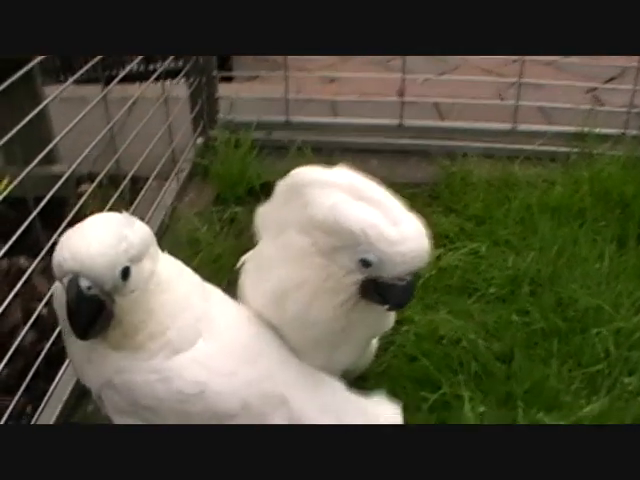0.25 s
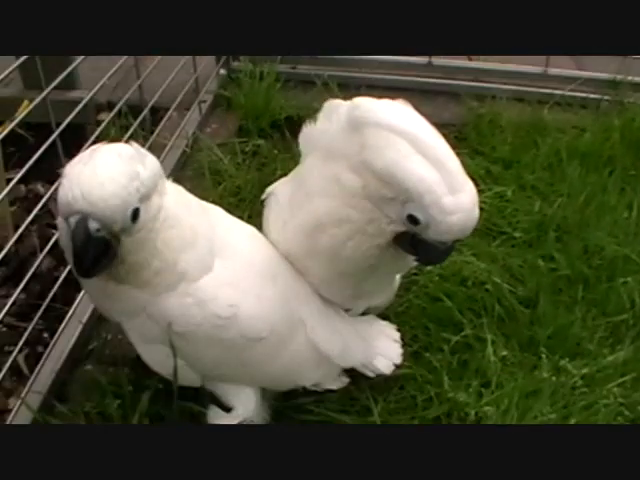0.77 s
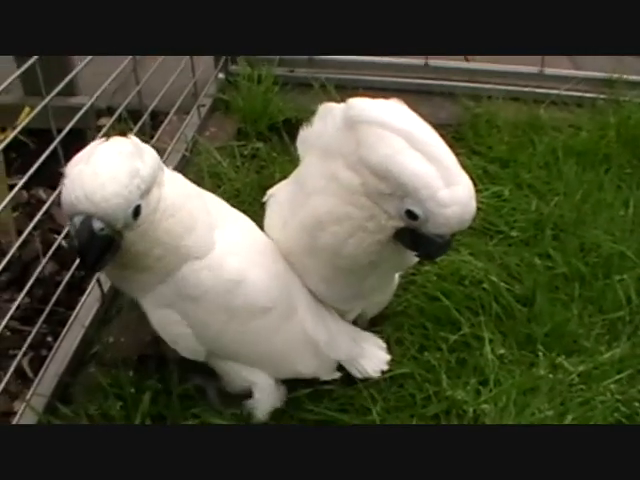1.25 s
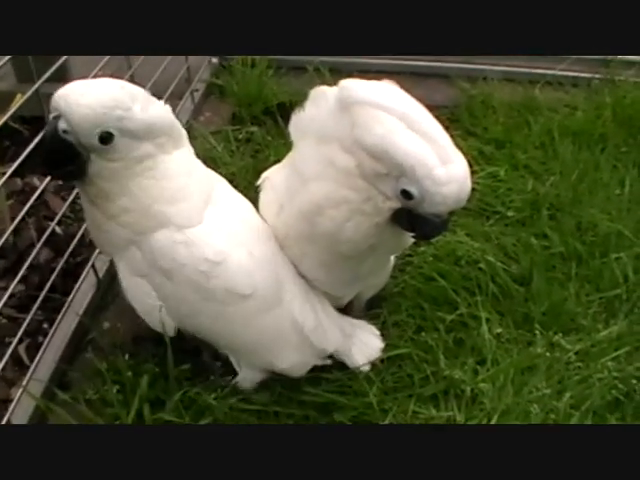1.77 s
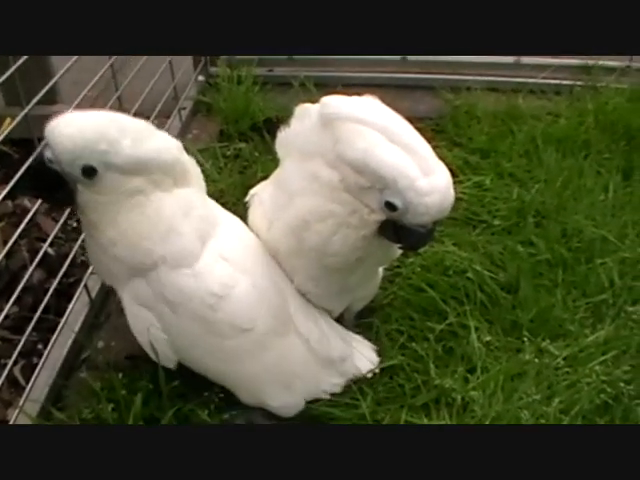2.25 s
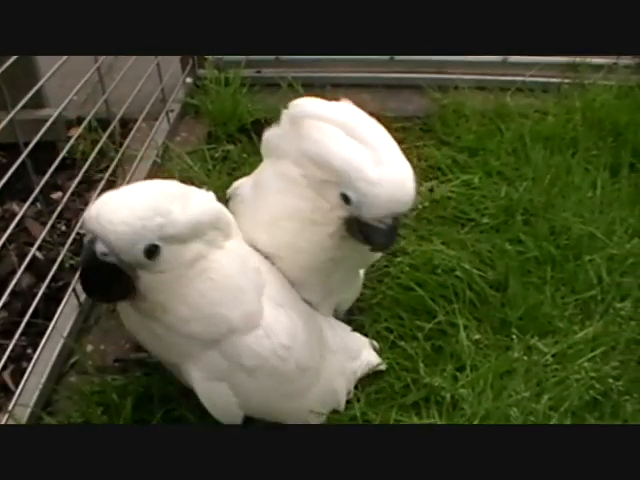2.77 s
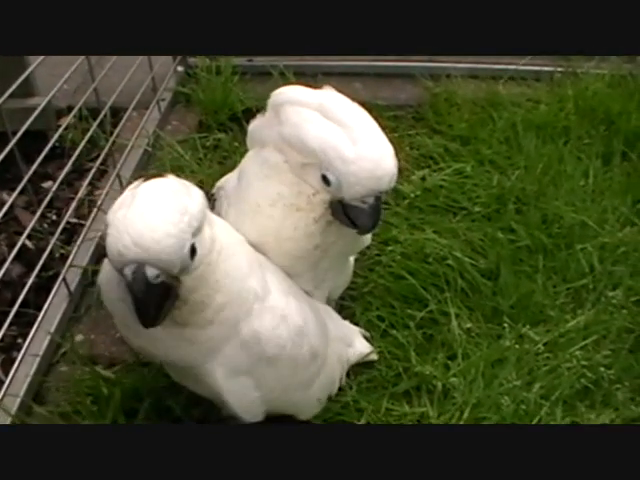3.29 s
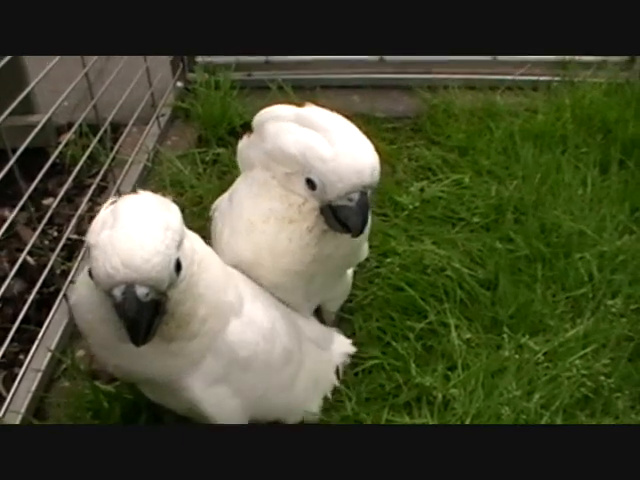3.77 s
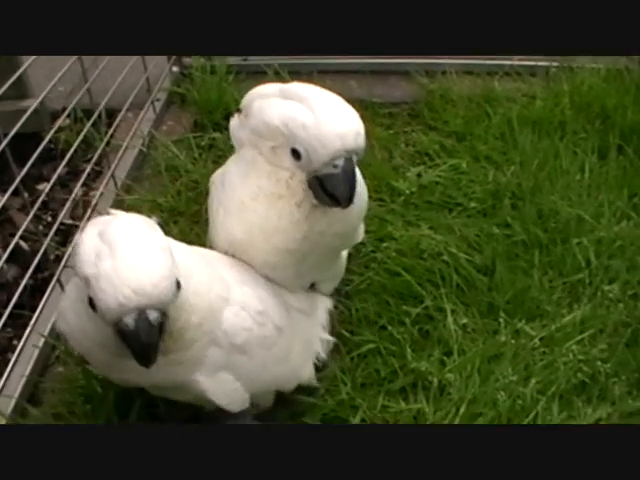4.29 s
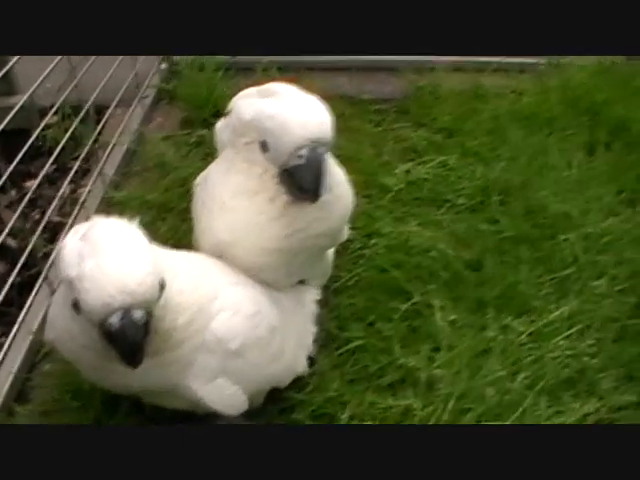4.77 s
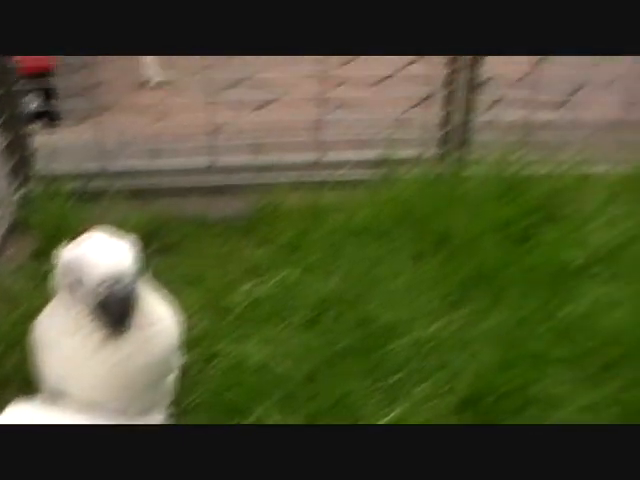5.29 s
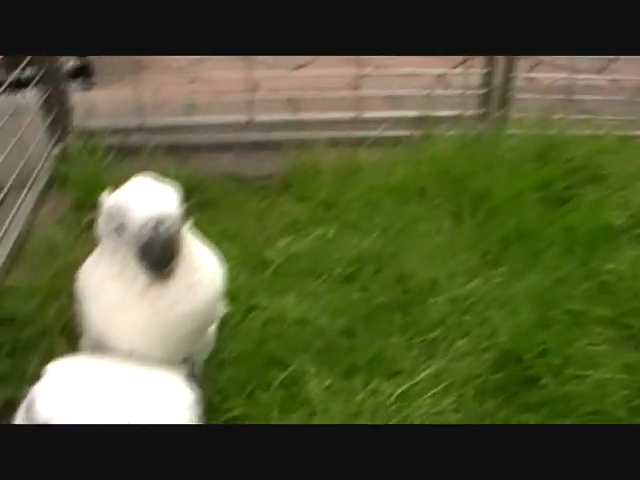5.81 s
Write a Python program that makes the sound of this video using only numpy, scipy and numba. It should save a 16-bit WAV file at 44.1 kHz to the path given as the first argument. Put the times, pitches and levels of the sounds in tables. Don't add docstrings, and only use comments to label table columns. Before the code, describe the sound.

Outdoors in a grassy pen, claws and feathers rustle and tick in grass while a distant small bird trills thinly. A brief, fairly quiet rasping note comes from a young parrot, then after a pause two loud hoarse squawks and a faint whimper. Near the end come two more rough squawks, the last breaking into a yelp. Low traffic rumbles beneath. The close handheld stereo microphone catches short reflections from lawn and fence.

```python
import sys
import numpy as np
from scipy import signal
from scipy.fft import rfft, irfft, next_fast_len
from scipy.io import wavfile
from scipy.ndimage import uniform_filter1d
from numba import njit

SR = 44100
rng = np.random.default_rng(int(sys.argv[2]) if len(sys.argv) > 2 else 0)


def natural_amplitude(level_db):
    exponent = np.asarray(level_db, float) / 20
    return 10 ** exponent


def log_audio(samples):
    frames = np.atleast_2d(samples).T
    limited = np.clip(frames, -1, 1)
    pcm = np.round(limited * 32767).astype(np.int16)
    wavfile.write(sys.argv[1], SR, pcm)


N = 266364


def rms_one(x):
    return x / np.sqrt(np.mean(x ** 2) + 1e-20)


def in_time(rows):
    s, *columns = np.transpose(rows)
    return [np.interp(np.arange(N) / SR, s, c) for c in columns]


def in_spans(tables, fade_s):
    t = np.arange(N) / SR
    gates = []
    for rows in tables:
        inside_s = np.minimum(t - rows[0][0], rows[-1][0] - t)
        gates.append(np.clip(1 + inside_s / fade_s, 0, 1))
    return [np.max(gates, axis=0)] + in_time([row for rows in tables for row in rows])


def at_hz(points, hz):
    return np.interp(np.log(hz), np.log(np.array(points)[:, 0]), np.array(points)[:, 1])


def band(x, low_hz, high_hz, order=2):
    return signal.sosfilt(signal.butter(order, [low_hz, min(high_hz, .45 * SR)], "band", fs=SR, output="sos"), x)


def drift(rate_hz):
    r = np.exp(-2 * np.pi * rate_hz / SR)
    return rms_one(signal.lfilter([1], [1, -2 * r, r * r], rng.standard_normal(N + SR))[SR:])


def evened(x, span_s):
    return x / np.sqrt(uniform_filter1d(x ** 2, int(span_s * SR)) + 1e-12)


def panned(x, lr_db):
    return np.array([x * natural_amplitude(lr_db / 2), x * natural_amplitude(-lr_db / 2)])


@njit
def resonate(x, w, r):
    y = np.zeros(len(x))
    for i in range(2, len(x)):
        y[i] = (1 - r * r) / 2 * (x[i] - x[i - 2]) + 2 * r * np.cos(w[i]) * y[i - 1] - r * r * y[i - 2]
    return y


# (f/Hz, likeness [0-1])
LIKENESS = [(60, 0.95), (180, 0.99), (550, 0.86), (1650, 0.59), (4970, 0.75), (15000, 1)]


def banded_noise(spectrum, white, patchy_db):
    out, together = 0, drift(1.5)
    edges = 22 * 2 ** np.arange(0, 10, .5)
    for k, (low, high) in enumerate(zip(edges, edges[1:])):
        mid, side = band(white[k % 2], low, high)
        hz = np.sqrt(low * high)
        alike = np.clip(at_hz(LIKENESS, hz), 0, .995)
        flicker = 0.6 * together + np.roll(together, 9001 * k)
        gain = natural_amplitude(at_hz(spectrum, hz) + patchy_db * flicker)
        out = out + gain * (np.sqrt(1 + alike) * mid + np.sqrt(1 - alike) * side * [[1], [-1]])
    return rms_one(out)


# (f/Hz, level/dB [per Hz])
AIR = [(13, -47), (22, -34), (109, 2), (152, 3.5), (189, -2.5), (278, -0.5), (457, -8.5), (690, -10.5),
       (792, -17.5), (1130, -10), (1970, -15), (3920, -22), (5930, -19), (8260, -36), (16000, -41)]


def open_air():
    return natural_amplitude(-46) * banded_noise(AIR, rng.standard_normal((2, 2, N)), patchy_db=2.0)


def hum():
    return natural_amplitude(-61 + 1.0 * drift(3.3)) * np.sin(2 * np.pi * 51 * np.arange(N) / SR)


# (f/Hz, level/dB [per Hz])
RUSTLE_COLOUR = [(2940, -39), (5000, -4), (7130, 0), (10800, -6), (16000, -17)]
# (t/s, bright level/dB, dull level/dB, rise/s, fall/s [both over 30 dB])
STIRS = [(0.0, -48, -52, .03, .03), (.16, -49, -58, .11, .12), (.572, -48, -52, 0.74, .08),
         (.74, -39, -58, .02, 0.25), (.772, -39, -49, 0.059, .1), (1.034, -37.5, -64, 0.038, 0.66),
         (1.23, -34.5, -51, .03, 0.27), (1.302, -43, -37.5, 0.021, 0.32), (1.645, -48, -55, .03, 0.28),
         (1.758, -42.5, -64, 0.21, 0.054), (1.958, -42, -67, .13, .09), (2.075, -34, -65, 0.011, 0.13),
         (2.22, -45, -57, .2, 0.11), (2.78, -68, -46.5, 0.05, 0.47), (3.022, -41.5, -63, 0.057, 0.17),
         (3.33, -56, -41.5, 0.078, 0.38), (4.3, -39.5, -62, .1, 0.25), (3.742, -50, -66, 0.74, 0.55),
         (3.952, -64, -46, 0.5, 1), (5.036, -42, -64, .09, .2), (5.33, -45, -40.5, 0.16, 0.14),
         (6.034, -53, -43, 0.082, .3), (6.001, -70, -38, 0.15, 0.26)]
# (t/s, level/dB)
BRUSH_BED = [(0, -83), (2.7, -62), (2.9, -52), (4.3, -52), (4.9, -53), (6.04, -42)]


def rustle():
    t = np.arange(N) / SR
    bright, dull = 0, natural_amplitude(in_time(BRUSH_BED)[0])
    for s, bright_db, dull_db, rise_s, fall_s in STIRS:
        swell = natural_amplitude(-30 * np.maximum((s - t) / max(rise_s, .004), (t - s) / max(fall_s, .004)))
        bright = np.hypot(bright, natural_amplitude(bright_db) * swell)
        dull = np.hypot(dull, natural_amplitude(dull_db) * swell)
    shape = (2, 2, N)
    snapped = rng.random(shape) < 5000 / SR
    snaps = snapped * natural_amplitude(0.63 * rng.exponential(1, shape)) * rng.standard_normal(shape)
    brushing = panned(rms_one(band(snaps[0, 0], 670, 5020)), -1.3)
    snapping = banded_noise(RUSTLE_COLOUR, snaps, patchy_db=2.5)
    return bright * natural_amplitude(-14.5) * snapping + dull * natural_amplitude(-6.5) * brushing


# (t/s, peak level/dB, ring f/Hz, level below 3 kHz/dB, left-right/dB)
TICKS = [(0.157, -24.5, 3350, -33.5, -5), (0.4717, -42, 5930, -47.5, -0.5), (0.5217, -46, 2420, -47, -4),
         (0.5753, -48, 1670, -57, 0.0), (0.765, -31.5, 5680, -58, 3), (1.2987, -24, 6150, -39, 3),
         (2.0706, -34, 2300, -51, 0.0), (2.208, -46, 1660, -65, 0.0), (2.232, -46, 9000, -62, -3),
         (3.022, -38, 1500, -65, 0.0), (3.3288, -46, 2610, -41.5, 4.5), (3.631, -36, 2720, -50, 4),
         (5.0258, -37, 1500, -57, 0.0)]


def ticks():
    out, t = np.zeros((2, N)), np.arange(2000) / SR
    fast, slow = np.exp(-t / .003), np.exp(-t / .012)
    for (s, peak_db, hz, low_db, lr_db), noise in zip(TICKS, rng.standard_normal((len(TICKS), 2, 2000))):
        ring = 0.42 * np.sin(2 * np.pi * hz * t)
        crack = (band(noise[0], 3900, 8300) + ring) * (fast + 0.19 * slow)
        knock = band(noise[1], 550, 4440) * (fast + 0.21 * slow)
        hit = natural_amplitude(peak_db - 4.0) * crack + natural_amplitude(low_db + 8) * knock
        hit[380:] += .4 * hit[:-380]
        out[:, round((s + .001) * SR):][:, :2000] += panned(hit, lr_db)
    return out


# (t/s, length/s, f/Hz, level/dB)
TRILLS = [
    (0.416, 0.39, 5740, -60),
    (1.074, 0.24, 5700, -60.5),
]


def trill():
    sag_hz_per_s, fade_db = 550, 2
    lines = []
    for s, length, hz, db in TRILLS:
        lines.append([(s + u * length, hz - sag_hz_per_s * (u - .5) * length, db - fade_db * (u - .5))
                      for u in (0, 1)])
    gate, hz, level_db = in_spans(lines, fade_s=0.026)
    blurred = resonate(rng.standard_normal(N), 2 * np.pi * hz / SR, np.exp(-np.pi * 190 / SR))
    return gate * natural_amplitude(level_db - 2 + 2.5 * drift(25.0)) * rms_one(blurred)


# (t/s, pulse rate f/Hz, roughness [0-1])
SYRINX = [(2.33, 655, .08), (2.39, 634, .1), (2.41, 680, .22), (2.455, 722, .28), (2.465, 860, .42),
          (2.75, 850, .38), (3.95, 520, .7), (4.1, 600, .6), (4.125, 890, .3), (4.17, 920, .3),
          (4.22, 1030, .34), (4.33, 1100, .7), (4.39, 560, .5), (4.44, 860, .33), (4.5, 1030, .24),
          (4.55, 1100, .25), (4.62, 1075, .4), (4.82, 1095, .3), (5.35, 840, .2), (5.39, 870, .3),
          (5.42, 1080, .38), (5.46, 1010, .25), (5.5, 1080, .6), (5.62, 1100, .85), (5.65, 680, .4),
          (5.7, 820, .28), (5.73, 900, .5), (5.82, 1100, .5), (5.83, 1385, .28), (6.0, 1330, .8)]


def syrinx(weak):
    per_s, rough = in_time(SYRINX)
    phase = np.cumsum(per_s * (1 + .15 * rough * drift(250.0))) / SR
    cycle = np.floor(phase)
    late = np.clip((phase - cycle) * SR / per_s, 0, 1)
    fired = np.diff(cycle, prepend=0) > 0
    flutter_db = rough * (5 * drift(600.0) + 3 * drift(120.0))
    strength = (1 - weak * (cycle % 2)) * natural_amplitude(flutter_db)
    pulses = fired * strength * (1 - late) + np.roll(fired * strength * late, -1)
    leak = rng.standard_normal(N) * np.exp(-2 * (phase - cycle)) * strength * np.sqrt(per_s / SR)
    return np.sqrt(1 - .8 * rough) * pulses + 1.9 * rough * leak


def scattered(x):
    for lag in (7, 19, 31):
        a = np.zeros(lag + 1)
        a[[0, lag]] = 1, -.42
        x = signal.lfilter(a[::-1], a, x)
    return x


# (t/s, effort level/dB, beak opening [0-1])
FIRST_BOUT = [
    [(2.33, -61, 0.2), (2.344, -42, 0.7), (2.36, -36, 0.72), (2.388, -30.5, 0.75), (2.41, -38.5, 0.89),
     (2.45, -38.5, 0.68)],
    [(2.455, -37.5, .45), (2.569, -38, 0.58), (2.657, -42, 0.43), (2.73, -66, 0.8)],
]
SECOND_BOUT = [
    [(3.96, -75, 0), (4.026, -59, 0.08), (4.113, -43.5, 0.25), (4.123, -29, 0.38), (4.155, -26.5, 0.44),
     (4.188, -18, 0.72), (4.24, -21.5, 0.79), (4.312, -51.5, 0.84), (4.36, -48, 0.57)],
    [(4.385, -51, 0.14), (4.423, -45, 0), (4.44, -28.5, 0.07), (4.474, -19, 0.61), (4.536, -18, 0.96),
     (4.588, -37, .8), (4.62, -41, 0.77)],
    [(4.63, -43.5, 0.5), (4.716, -46, 0.5), (4.76, -45.5, 0.23), (4.784, -46, 0.7), (4.84, -61, 0)],
]
THIRD_BOUT = [
    [(5.362, -45, 0.65), (5.378, -30, 0.42), (5.41, -23, 0.39), (5.43, -20.5, 0.63), (5.476, -21, 0.61),
     (5.522, -39.5, 0.65), (5.63, -59.5, 0.7)],
    [(5.655, -51, 0.17), (5.675, -44, 0), (5.684, -44, 0), (5.695, -24.5, 0.1), (5.718, -19.5, 0.27),
     (5.726, -19, 0.51), (5.788, -18.5, 0.91), (5.82, -22, 0.87)],
    [(5.825, -27, 1.05), (5.849, -25, 0.73), (5.937, -52.5, 1.1), (5.98, -52, 0.87)],
]
CALLS_MADE = FIRST_BOUT + SECOND_BOUT + THIRD_BOUT


def per_call(table):
    held = []
    for rows, row in zip(CALLS_MADE, table):
        held += [(rows[0][0], *row), (rows[-1][0], *row)]
    return np.array(in_time(held))


# (low edge f/Hz, high edge f/Hz, resonance width/Hz, valley level/dB, share of left-right shift [0-1])
THROAT = [
    (487, 1700, 555, -12.5, 0.42),
    (1500, 2840, 600, -8, 0.69),
    (3280, 4600, 360, -4, 1),
    (4560, 9080, 960, -12.5, 0.34),
]
# (second, third, fourth, fifth throat resonance f/Hz, highest beak resonance f/Hz)
POSTURE = [(2270, 2670, 3590, 4900, 8200), (2020, 2750, 3330, 5260, 8700), (1910, 2870, 3940, 5210, 7300),
           (2090, 2780, 3690, 5100, 7700), (2240, 2740, 3700, 5000, 8000), (2230, 2940, 3490, 5180, 8800),
           (2090, 3000, 3500, 5150, 9000), (2140, 3000, 3580, 5160, 9800)]
# (low, upper, top band over the middle one/dB, third resonance share/dB, highest resonance/dB)
COLOUR = [(5, -3, -8, -6, -28), (-3.5, -9, -7, -25, -17), (-2.5, -10, -7.5, -2, -12),
          (-4.5, -6, -6, -1, -13.5), (-15.5, -7.5, -12, -3, -22), (-5.5, -5, -9, -3, -18),
          (-3.5, -8.5, -11, -1, -12), (-1.5, -8, -13.5, -5, -28)]
# (weak second pulse [0-1], left-right/dB, lower beak level/dB, crop level/dB, reach of slide [ratio])
HEAD = [(0.34, -3, -9, 11.5, 0.47), (0.5, -1.5, -14, -2, .6), (0.44, -3.5, -6, -5.5, 1.3),
        (0.53, -1, 0, -1, 0.67), (.7, 1, -6, -22, .5), (0.58, -2, -6.5, -28, .6),
        (0.65, -4.5, -14, -18.5, 1.03), (0.14, 1, -9, -25, 0.51)]
# (beak shut f/Hz, beak open f/Hz, depth [0-1], lower beak resonance f/Hz)
NOSE = [(4300, 4350, 0.28, 5900), (5950, 5200, 0.17, 6750), (2700, 3500, 0.72, 6120), (2720, 6180, 1, 5950),
        (6000, 6600, 0.1, 6040), (6250, 7200, 0, 6380), (7300, 6500, 0, 6960), (4400, 4000, 0.24, 6640)]
SLIDE_WITH_OPENING = (0.31, 0.013, 0.062, 0.16, 0.058, 0.14)
GAIN_WITH_OPENING_DB = (-14, 8, 6, 0, -23)
GAIN_PER_EFFORT_DB = (-0.32, -0.072, -0.13, -0.0077, 0.34)


def squawks():
    gate, middle_db, opening = in_spans(CALLS_MADE, fade_s=.008)
    from_half = opening - .5
    weak, lr_db, sixth_db, crop_db, reach = per_call(HEAD)
    shut_hz, open_hz, depth, sixth_hz = per_call(NOSE)

    peak_db, = per_call([[max(db for s, db, o in rows)] for rows in CALLS_MADE])
    weak = np.clip(weak * (2 + (middle_db - peak_db) / 33), 0, .95)
    progress, = in_time([row for rows in CALLS_MADE for row in ((rows[0][0], -.5), (rows[-1][0], .5))])
    lr_db = lr_db + 8 * progress

    f1 = 673 + (1362 - 673) * opening
    crop_hz = 477 + (714 - 477) * opening
    rest = np.insert(per_call(POSTURE), 4, sixth_hz, axis=0)
    f2, f3, f4, f5, f6, f7 = rest * (1 + np.outer(SLIDE_WITH_OPENING, reach * from_half))

    crop_db = crop_db - 60 * from_half
    colour = per_call(COLOUR) + np.outer(GAIN_WITH_OPENING_DB, from_half)
    low, upper, top, third_db, seventh_db = colour + np.outer(GAIN_PER_EFFORT_DB, middle_db + 25)
    second_db = 10 * np.log10(np.clip(1 - natural_amplitude(third_db) ** 2, .05, 1))
    modes = [[(f1, 0), (crop_hz, crop_db)],
             [(f2, second_db), (f3, third_db)],
             [(f4, 0)],
             [(f5, 0), (f6, sixth_db), (f7, seventh_db)]]

    source, voice = scattered(syrinx(weak)), 0
    for throat_band, rings, rel_db in zip(THROAT, modes, (low, 0, upper, top)):
        low_hz, high_hz, width_hz, valley_db, share = throat_band
        flat = band(source, low_hz, high_hz, order=3)
        r = np.exp(-np.pi * width_hz / SR)
        part = natural_amplitude(valley_db) * flat
        for hz, ring_db in rings:
            w = 2 * np.pi * hz / SR
            part = part + natural_amplitude(ring_db) * resonate(resonate(flat, w, r), w, r)
        voice = voice + panned(evened(part, span_s=0.0222) * natural_amplitude(middle_db + rel_db), share * lr_db)

    nose = 2 * np.pi * (shut_hz + (open_hz - shut_hz) * opening) / SR
    nose_r = np.exp(-np.pi * 750 / SR)
    for _ in range(2):
        voice = voice - np.clip(depth, 0, 1) * [resonate(side, nose, nose_r) for side in voice]
    return gate * voice


# (delay to left port t/s, delay to right port t/s, level/dB)
ECHOES = [
    (.0009, 0.0036, -15),
    (.0061, 0.0092, -5),
]


def lawn_and_fence(voice):
    near = 0
    for *lags, db in ECHOES:
        near = near + natural_amplitude(db) * np.array([np.roll(side, round(s * SR)) for side, s in zip(voice, lags)])
    return near


def yard(x):
    t60_s, wall_cut_hz = 0.55, 2760
    size = next_fast_len(N + SR)
    w = 2 * np.pi * np.arange(size // 2 + 1) / size
    dull = 1 / (1 + 1j * w * SR / (2 * np.pi * wall_cut_hz))
    spectrum, out = rfft(x, size), np.zeros((2, N))
    for side, lags in enumerate(rng.uniform(.012, .05, (2, 6)) * SR):
        loops = [dull * natural_amplitude(-60 * lag / SR / t60_s) * np.exp(-1j * w * lag) for lag in lags]
        out[side] = irfft(spectrum * sum(g / (1 - g) for g in loops), size)[:N]
    return out


def scene():
    voice = squawks()
    birds = voice + lawn_and_fence(voice) + natural_amplitude(-18) * yard(voice.mean(axis=0))
    return open_air() + hum() + rustle() + ticks() + panned(trill(), -1.5) + birds


def top_cut(x):
    return signal.sosfilt(signal.butter(12, 15760, fs=SR, output="sos"), x)


def record(dry):
    treble = np.roll(band(dry.mean(axis=0), 10700, 15000, order=3), 60)
    ports = dry + natural_amplitude(-1) * treble * [[1], [-1]]
    thin = signal.sosfilt(signal.butter(4, 36.0, "high", fs=SR, output="sos"), ports)
    rounded = 1.205 * np.tanh(thin)
    mix = signal.sosfilt(signal.cheby2(12, 70, 17500, fs=SR, output="sos"), rounded)
    return top_cut(mix)


dry = scene()
out = record(dry)
log_audio(out)
```